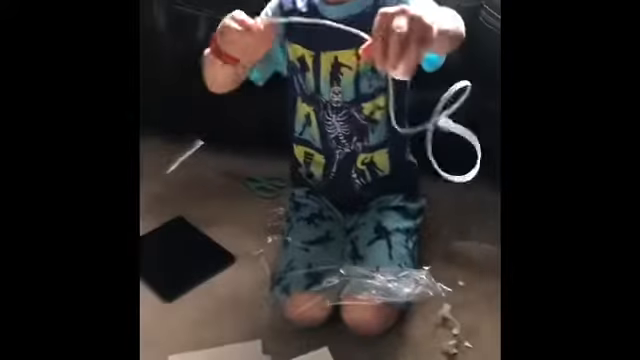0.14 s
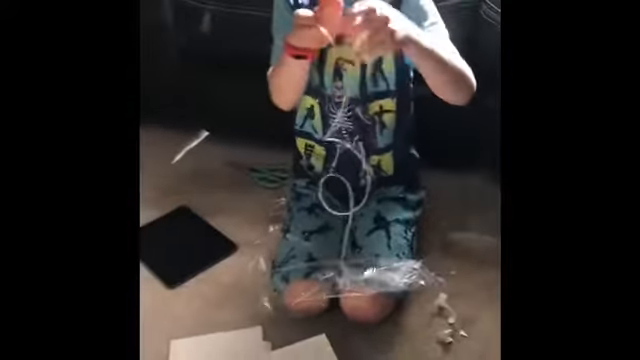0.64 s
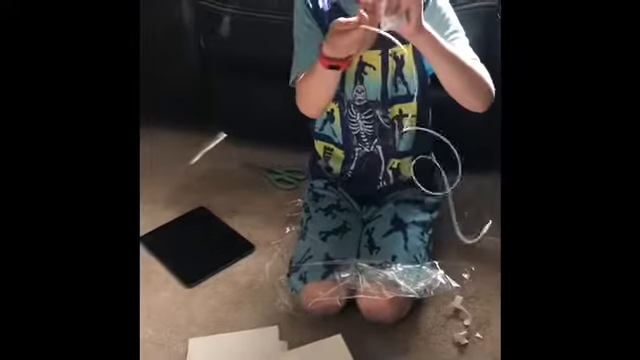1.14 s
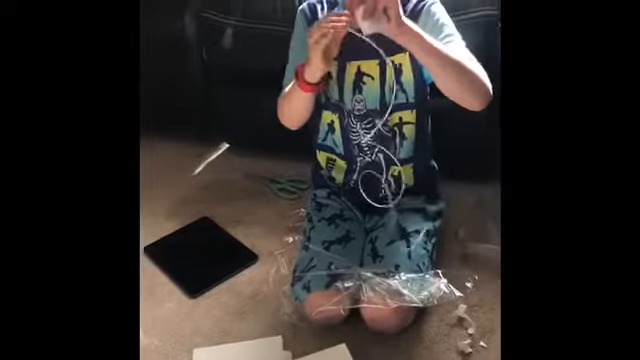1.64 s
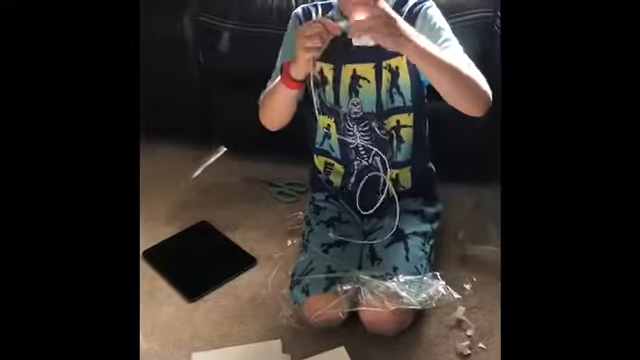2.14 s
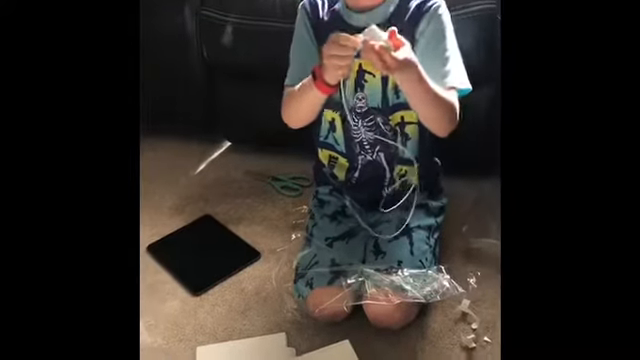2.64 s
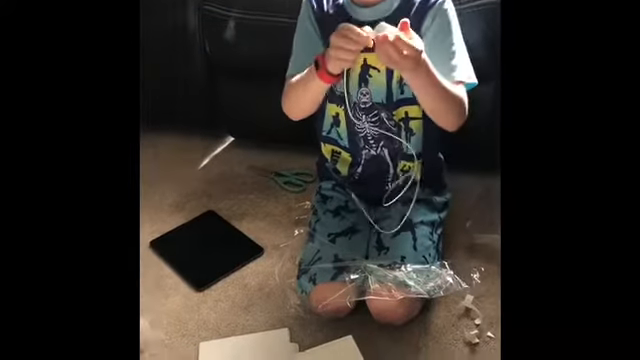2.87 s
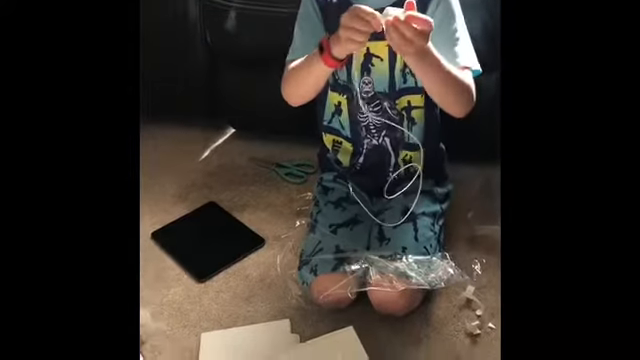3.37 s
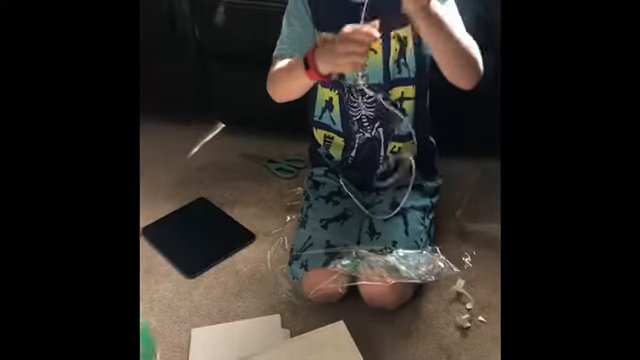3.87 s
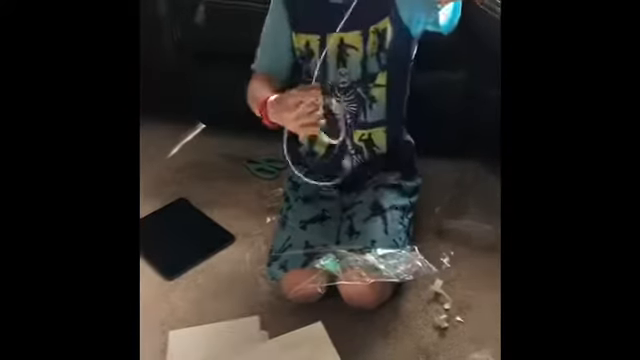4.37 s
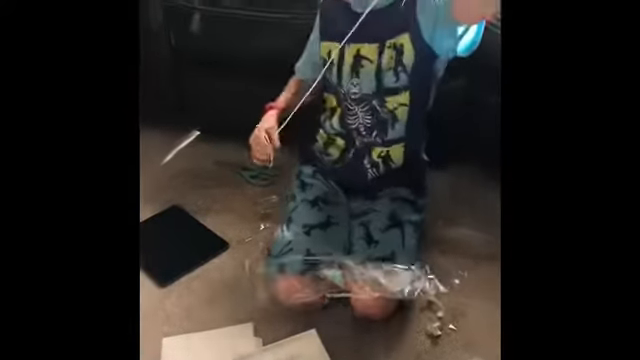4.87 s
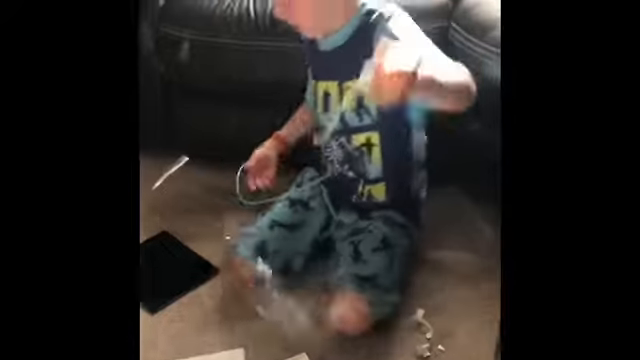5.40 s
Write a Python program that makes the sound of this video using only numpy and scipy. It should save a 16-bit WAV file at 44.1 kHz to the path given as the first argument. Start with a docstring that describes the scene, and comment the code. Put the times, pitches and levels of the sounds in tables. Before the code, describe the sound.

Thin clear plastic wrapping crackles and rustles in irregular bursts with dull hollow knocks, one sharp loud snap midway, in a quiet carpeted room.

```python
"""Thin plastic film and a hollow cardboard box are handled in a carpeted living room for 5.5 s.
From the start the film hisses (shaped, clumpy noise) and the dragged box hums and thuds (lumpy noise through its modes).
Creases snap (noise bursts through resonances) and hands knock (pushes through the box modes), densely until 1.2 s.
A sparser stretch follows; from 2.6 s it gets busier, with the hardest snaps and blow near 3.37 s, then lighter creasing.
A short, dull echo (decaying noise tails) follows snaps and knocks; quiet room tone (shaped noise) runs throughout."""
import sys
import numpy as np
from scipy import signal
from scipy.fft import rfft, irfft, next_fast_len
from scipy.io import wavfile
from scipy.ndimage import uniform_filter1d, map_coordinates

SR = 44100
rng = np.random.default_rng(int(sys.argv[2]) if len(sys.argv) > 2 else 0)


def pcm_store(signal):
    """Save signal as 16-bit PCM."""
    levels = np.round(np.clip(np.atleast_2d(signal), -1, 1) * 32767)
    wavfile.write(sys.argv[1], SR, levels.astype(np.int16).T)


def gain_from_db(level_db):
    """Convert decibel levels to linear amplitude factors (20 dB per decade)."""
    decades = np.asarray(level_db, float) / 20
    return 10 ** decades


N = 243161

# creases, sharp snaps to slow crumples: start_s, peak_db, ring_hz, body_db (7 dB under body re ring rms), rise_ms
CREASES = [(.0199, -23, 3960, -11.5, 1.53), (.1331, -42, 3700, -21, 0.73), (.187, -29.5, 2000, 28, 0.54),
           (.2328, -29.5, 5200, -34, 1.4), (.2558, -27.5, 2100, -6, 1.23), (.2864, -36, 2340, 0, .99),
           (.341, -24, 5030, -36, 1.2), (.3514, -33, 5130, -18, 2.2), (.402, -30.5, 6050, -7, 3.25),
           (.4514, -24, 3480, -10, 0.81), (.4663, -27, 3210, -15, 5.5), (.4814, -39, 2500, -23, 9.4),
           (.5771, -35, 5700, -24, 0.47), (.611, -33, 2650, -3, 0.94), (.6559, -30, 2124, 1, 0.75),
           (.6809, -33, 2260, 15, 0.36), (.7173, -27.5, 2530, 25, 0.89), (.7452, -31, 2310, -19, 1),
           (.7951, -29.5, 6500, -26, 2.7), (.8094, -29.5, 6600, -8.5, 9.1), (.9664, -32, 2280, 0, 0.89),
           (1.0114, -35.5, 5700, -9, 2.86), (1.1109, -25, 2560, 1.5, 0.68), (1.1608, -38.5, 5500, 18, .7),
           (1.2057, -33.5, 2880, -3, .97), (1.6229, -37.5, 2500, -11.5, 4.5),
           (1.723, -37.5, 1990, -9.5, 9.8), (1.847, -35.5, 4950, -13, 4.2), (2.2707, -35.5, 4800, -9, 0.6),
           (2.3294, -39.5, 2330, -7, 0.82), (2.4104, -43, 6750, -7, 0.59), (2.532, -45, 3020, -6, 1.7),
           (2.59, -26.5, 6100, 0, 1.54), (2.6134, -27.5, 4300, -32, 0.96), (2.6299, -25, 6940, -12, 2.1),
           (2.6514, -20.5, 6480, -16, 1.5), (2.9048, -40, 4200, -37, 1.16), (2.9744, -44, 5000, -6, 2.7),
           (3.0545, -40, 7000, -5, 0.95), (3.0764, -39.5, 2800, -4.5, .96), (3.1552, -23, 4600, -7, 7.6),
           (3.1744, -34.5, 3680, -32, 10.7), (3.1966, -23, 6240, -12.5, 3.9), (3.3059, -27, 4540, 1, 2.7),
           (3.3672, -8.5, 2680, -9, .7), (3.3677, -8.5, 5460, -24, 0.57), (3.4072, -15, 3220, -2, 0.54),
           (3.465, -24.5, 8600, -20, 0.64), (3.5394, -33.5, 4330, -14, 0.8), (3.593, -43, 6000, -19, 3.7),
           (3.6601, -37.5, 3920, -21, 1.3), (3.7828, -34, 5970, -10, 1.5), (3.7878, -26, 5400, -8.5, 0.57),
           (3.8464, -32.5, 5520, 9, 0.69), (3.937, -33, 3000, -14, 0.8), (3.9559, -33, 2700, -7, 8),
           (4.0574, -31, 4570, -49, 10), (4.0716, -25, 3500, -43, 6.7), (4.1194, -31.5, 3420, -23, 0.65),
           (4.3076, -47.5, 5240, -37, 1.2), (4.3256, -50, 3940, -26, 1.1), (4.4124, -36.5, 5030, -18, 1.9),
           (4.4243, -34, 5600, -16, 0.72), (4.4674, -48, 5400, -22, 1.4), (4.595, -46.5, 5300, -28, 7.5),
           (4.666, -45, 2000, -2, 0.55), (4.6922, -22.5, 3800, -33, 0.91), (4.7486, -55, 3460, -15, .8),
           (4.7611, -32.5, 4150, -38, .99), (4.8494, -33, 3550, -13.5, 0.78),
           (4.889, -42.5, 5460, -26, 4.6), (4.9382, -24.5, 4050, -17, 0.64), (4.9781, -38, 3350, -7, 1.66),
           (5.03, -46, 7000, -34, 1.6), (5.095, -47.5, 4270, -3, 1.2), (5.1292, -44, 4220, -18, 8.9),
           (5.2254, -48, 5500, -18, 0.86), (5.2694, -53, 9500, -21, 0.54), (5.3158, -42.5, 2370, -7, 5.2),
           (5.4041, -34, 2920, -31, 6.9), (5.447, -35.5, 2090, -13, 4.6)]
# blows on the box: start_s, peak_db, loudest_mode_hz, contact_ms
BLOWS = [(0.021, -28.5, 158, 2.5), (0.19, -28, 605, 2.04), (0.26, -28, 225, 0.43),
         (0.288, -20.5, 598, 0.85), (0.303, -8.5, 216, 1.3), (0.31, -41, 226, 1.2), (0.328, -24.5, 88, 3.3),
         (0.452, -17.5, 345, 2), (0.46, -17, 138.5, 1.67), (0.479, -22.5, 203, 0.79), (0.52, -28.5, 80, 3),
         (0.555, -28.5, 268, 0.72), (0.621, -26.5, 367, 1.9), (0.65, -18.5, 220, 1.5),
         (0.687, -27.5, 268, 2.1), (0.843, -26, 318, 0.91), (0.845, -27.5, 950, 0.66),
         (0.965, -34, 640, 1.9), (1.109, -45, 830, 1.8), (1.208, -28.5, 380, 1.23), (1.62, -39, 141, 3.8),
         (2.589, -34.5, 875, 1.4), (2.614, -30.5, 660, 0.83), (2.634, -23.5, 600, 1.13),
         (2.652, -24, 322, 1.8), (3.052, -34, 376, 3.5), (3.158, -32.5, 630, 1.5), (3.197, -35, 645, 2),
         (3.31, -16, 278, 1.27), (3.326, -26.5, 256, 2.8), (3.368, -5.5, 306, 2.78), (3.383, -26, 230, 1.8),
         (3.412, -17, 249, 2.1), (3.429, -20.5, 100, 1.46), (3.471, -28, 120, 3), (3.666, -30.5, 250, 2.43),
         (3.785, -25.5, 346, 2.2), (3.852, -19.5, 237, 1.04), (3.898, -25, 252, 1.3),
         (4.115, -30.5, 210, 1.66), (4.396, -34.5, 240, 2.1)]


def unit(x):
    """Scaled to rms 1."""
    return x / np.sqrt(np.mean(x ** 2) + 1e-20)


def along(points, hz):
    """(Hz, value) points interpolated on a log-frequency axis."""
    point_hz, value = np.transpose(points)
    return np.interp(np.log(hz + 1), np.log(point_hz + 1), value)


def shape(points, hz):
    """Gain of a (Hz, dB) spectrum, silent outside its ends."""
    inside = (hz >= points[0][0]) * (hz <= points[-1][0])
    return gain_from_db(along(points, hz)) * inside


def curves(rows):
    """One value per sample for each column after the time."""
    s, *columns = np.transpose(rows)
    return [np.interp(np.arange(N) / SR, s, column) for column in columns]


def wobble(rate_hz):
    """A smooth random curve through rate_hz random knots a second."""
    knots = rng.standard_normal(int(N * rate_hz / SR) + 4)
    return map_coordinates(knots, [np.arange(N) * rate_hz / SR])


def filtered(x, response):
    """x passed through a complex response of frequency."""
    size = next_fast_len(len(x) + 8192)
    spectrum = rfft(x, size) * response(np.fft.rfftfreq(size, 1 / SR))
    return irfft(spectrum, size)[:len(x)]


def mode(f, hz, width_hz):
    """One causal resonance, gain 1 at its peak."""
    return 1j * f * width_hz / (hz * hz - f * f + 1j * f * width_hz)


def both(*levels):
    """Amplitude of independent sounds together: their powers add."""
    return np.linalg.norm(levels, axis=0)


def burst(rise_ms, size):
    """A cluster of uneven slips swells to its peak and dies away: short is sharp, long is soft."""
    u = np.arange(size) / SR / (rise_ms / 1000)
    lumps = np.repeat(gain_from_db(2.06 * rng.standard_normal(size // 32)), 32)  # slips under a millisecond long
    return rng.standard_normal(size) * lumps * (u * np.exp(-u)) ** 1.38


def add(track, start_s, sound, peak_db):
    """Lays a sound on a track, its loudest 3 ms at the given nominal peak."""
    loudest = np.sqrt(uniform_filter1d(sound ** 2, size=132).max())
    gain = gain_from_db(peak_db - 7.5) / loudest  # peak to short-time rms
    track[round(start_s * SR):][:len(sound)] += gain * sound


def wake(events, level_db, decay_s, follows):
    """An amplitude builds up after each event, more for a strong one (follows: dB per dB), and dies away."""
    typical_db, rise_s = -30, 0.002  # level_db is for a typical event, before the rise smooths it
    s, peak_db = np.transpose(events)[:2]
    kicks = gain_from_db(2 * (level_db + follows * (peak_db - typical_db)))
    power = np.bincount((s * SR).astype(int), kicks, N)
    keep = np.exp(-2 / (decay_s * SR))  # power dies twice as fast as amplitude
    lag = np.exp(-1 / (rise_s * SR))
    return np.sqrt(signal.lfilter([1 - lag], np.convolve([1, -keep], [1, -lag]), power))


def air():
    """Quiet room tone: steady noise under a fixed spectrum."""
    # relative spectrum: freq_hz, level_db_per_hz
    air_spectrum = [(18, -48), (30, -8), (95, 13), (252, 0.5), (702, -31), (1010, -4), (2610, -63),
                    (3140, -11), (5740, -20), (12300, -31), (16000, -41)]
    noise = rng.standard_normal(N)
    return gain_from_db(-59.5) * unit(filtered(noise, lambda f: shape(air_spectrum, f)))


def sheen_db(ring_hz, rise_ms):
    """Treble beside that of a 4 kHz, 1 ms crease: small panels are brighter, slow swells duller."""
    per_octave_db, per_slowing_db = 7.5, -2  # slowing: each doubling of the rise
    return per_octave_db * np.log2(ring_hz / 4000) + per_slowing_db * np.log2(rise_ms)


def settling():
    """Film settles after each crease, louder after a slow crumple; returns amplitudes of hiss and treble."""
    s, peak_db, ring_hz, _, rise_ms = np.transpose(CREASES)
    strength_db = peak_db + 2.5 * np.log2(rise_ms)
    hiss = wake(np.c_[s, strength_db], level_db=-58, decay_s=0.03, follows=1)
    bright_db = strength_db + sheen_db(ring_hz, rise_ms)
    return hiss, wake(np.c_[s, bright_db], level_db=-58, decay_s=0.03, follows=1)


def strokes():
    """A hand's quick strokes along the film swell and fade as bells; returns amplitudes of hiss and treble."""
    # strokes: peak_s, level_db, swell_s, fade_s, treble_db (beside the hiss)
    stroke_rows = [(.41, -46, 0.0098, .03, -4), (.47, -44, 0.022, 0.037, -16), (.58, -56, 0.027, 0.01, 4.5),
                   (.83, -47, 0.046, 0.037, 3), (1.02, -55, 0.044, 0.024, -3),
                   (1.85, -49, 0.019, 0.027, -2.5), (1.97, -55, 0.027, 0.072, -10),
                   (2.16, -60.5, 0.032, 0.027, -5.5), (2.32, -59, 0.018, 0.024, -4),
                   (2.5, -59.5, .05, 0.026, -7), (2.64, -48.5, 0.017, 0.062, -8),
                   (2.88, -61.5, 0.022, 0.097, -2.5), (3.43, -50.5, 0.051, 0.032, 0),
                   (3.16, -37.5, 0.0041, 0.029, -0.5), (3.6, -60, 0.0069, 0.011, 5.5),
                   (3.81, -53, 0.031, 0.03, 1.5), (3.9, -60, 0.03, 0.041, 1), (4.09, -55, .02, 0.036, 4.5),
                   (4.42, -58.5, 0.024, 0.056, -4), (4.6, -60.5, 0.032, 0.072, -3),
                   (4.77, -59, 0.026, 0.029, -3), (5.15, -55, 0.019, 0.05, -3)]
    s, level_db, swell_s, fade_s, treble_db = np.transpose(stroke_rows)[..., None]
    t = np.arange(N) / SR - s
    width_s = np.maximum(np.where(t < 0, swell_s, fade_s), .005)  # 5 ms at least
    power = gain_from_db(2 * level_db) * np.exp(-(t / width_s) ** 2)
    treble_power = gain_from_db(2 * treble_db) * power
    return np.sqrt(power.sum(axis=0)), np.sqrt(treble_power.sum(axis=0))


def patchy(x):
    """Shifting folds: random gain in patches about a kilohertz by thirty milliseconds."""
    z = signal.stft(x, nperseg=256)[2]
    field = uniform_filter1d(rng.standard_normal(z.shape), size=7, axis=0)
    field = uniform_filter1d(field, size=10, axis=1)
    gain = gain_from_db(2.5 * unit(field))  # rms depth 2.5 dB
    return signal.istft(z * gain, nperseg=256)[1][:N]


def rustle():
    """Sliding film: clumpy rubbing hiss with small ticks; flares under each stroke and as a crease settles; the
    swell that stops abruptly near 1.5 s is probably a sniff."""
    # hiss level, and its body: mostly film rubbing; the swell that stops abruptly near 1.5 s is probably a
    # sniff: time_s, level_db, body_db (beside the hiss)
    hiss_levels = [(0, -55, 0.5), (.16, -61, -3), (.29, -48.5, 2), (.41, -52.5, -4), (.58, -56, -1.5),
                   (.72, -54.5, 1), (.9, -47, -5), (1.08, -59.5, -14), (1.25, -60, -1), (1.5, -51.5, -14.5),
                   (1.54, -69, -5), (1.61, -68.5, 1), (1.66, -62, 9.5), (1.78, -62.5, -4), (1.9, -55, 0),
                   (2.08, -71, -8), (2.25, -63.5, -2.5), (2.56, -65.5, -2), (2.72, -60.5, -3.5), (3.0, -74, -3),
                   (3.13, -56, -7), (3.26, -52.5, -14), (3.35, -59, -8), (3.55, -57, -1), (3.74, -66, -11),
                   (3.8, -60.5, -3.5), (4.0, -60, -3), (4.2, -63, -7), (4.37, -73.5, -1), (4.52, -69, -8),
                   (4.68, -59, -13), (4.9, -59.5, -7), (5.08, -59, -22), (5.27, -64.5, -3), (5.38, -64.5, 2),
                   (5.51, -54, -5)]
    # relative spectra of hiss, body and treble: freq_hz, level_db_per_hz
    hiss_spectrum = [(880, -37), (1500, -7), (2440, 2.5), (3850, 2.5), (4190, 2.5), (4780, 2), (5750, 3.5),
                     (9500, -23), (12400, -60), (20900, -120)]
    body_spectrum = [(500, -6), (800, -7), (1300, 0.5), (2000, -4.5), (2800, -21.5)]
    treble_spectrum = [(6500, 2.5), (9000, 4.5), (12500, 2), (15000, -1.5), (15900, -4), (16500, -29)]
    level_db, body_db = curves(hiss_levels)
    stroke, stroke_treble = strokes()
    settle, settle_treble = settling()

    clumps = gain_from_db(1.2 * wobble(45) + 1.6 * wobble(160))
    tick_hits = rng.random(N) < 1500 / SR  # 1500 a second on average
    ticks = tick_hits * gain_from_db(4.9 * rng.standard_normal(N)) * rng.choice([-1, 1], N)
    grain = patchy(clumps * (rng.standard_normal(N) + 0.51 * unit(ticks)))

    def part(spectrum):
        return unit(filtered(grain, lambda f: shape(spectrum, f)))

    hiss = both(gain_from_db(level_db), stroke, settle)
    # settling has its own body (+3.5 dB) and treble (-7.5 dB) balance
    body = both(gain_from_db(level_db + body_db), gain_from_db(body_db) * stroke, gain_from_db(3.5) * settle)
    treble = both(gain_from_db(level_db - 5.5), stroke_treble, gain_from_db(-7.5) * settle_treble)
    return hiss * part(hiss_spectrum) + body * part(body_spectrum) + treble * part(treble_spectrum)


def box(f, scatter_db):
    """Response of the box walls: modes of alternating sign, each caught at a new strength."""
    # wall modes: mode_hz, width_hz, level_db (before scatter)
    box_modes = [(81, 28, -4.5), (109, 21, -1), (166.3, 24, -1), (241.5, 28, 1), (286, 38.4, -1.5),
                 (350.4, 46.4, -1.5), (457, 186, -5), (569, 66, -4), (624, 31.4, -3), (874, 150, -10.5),
                 (1044, 59, -9), (1130, 280, -19.5)]
    total = 0
    for k, (hz, width_hz, level_db) in enumerate(box_modes):
        strength = gain_from_db(level_db + scatter_db * rng.standard_normal())
        total = total + (-1) ** k * strength * mode(f, hz, width_hz)
    return total


def drag():
    """Lumpy friction keeps the box humming and thuds into the floor, which booms on after each blow."""
    # pressing and dragging, and weight into the floor: time_s, level_db, thud_db (beside the hum, before drift)
    press = [(0, -43.5, -1), (.18, -53, -10), (.3, -40, -1), (.42, -42.5, -10), (.47, -36, 6),
             (.6, -43.5, -18), (.7, -42, -4), (.83, -37.5, -19), (.92, -45, -10), (1.09, -55.5, -2),
             (1.23, -48, -4), (1.34, -54, -5.5), (1.47, -50.5, -2), (1.63, -62.5, -9), (1.82, -50, -6),
             (2.03, -51.5, -13), (2.2, -55, -6), (2.55, -55, -6.5), (2.69, -49, -16), (2.81, -54, -2),
             (3.0, -56.5, -11), (3.27, -44.5, -1), (3.33, -40, -1), (3.45, -41.5, 2.5), (3.64, -54.5, 8),
             (3.77, -53.5, 1.5), (3.88, -38.5, -3), (4.07, -53, 1), (4.28, -58.5, -1), (4.44, -50.5, 2),
             (4.65, -57, 1), (4.95, -58.5, -6.5), (5.27, -59, -1), (5.51, -60.5, 1)]
    # relative thud spectrum: freq_hz, level_db_per_hz
    thud_spectrum = [(28, -45), (45, -10), (70, -5.5), (110, -3.5), (160, -8.5), (220, -1.5)]
    level_db, thud_db = curves(press)
    hum_friction = gain_from_db(3.5 * wobble(30)) * rng.standard_normal(N)
    hum = unit(filtered(hum_friction, lambda f: box(f, scatter_db=1.5) * mode(f, 315, 500)))
    thud_friction = gain_from_db(2.2 * wobble(8.6)) * rng.standard_normal(N)
    thud = unit(filtered(thud_friction, lambda f: shape(thud_spectrum, f)))
    drift_db = 1.5 * wobble(10)
    boom = wake(BLOWS, level_db=-55, decay_s=0.074, follows=0.69)
    return gain_from_db(level_db) * hum + both(gain_from_db(level_db + thud_db + drift_db), boom) * thud


def snaps():
    """A crease buckles: a ring set by the panel size, with more or less body and a little top."""
    out = np.zeros(N + SR)
    for s, peak_db, ring_hz, body_db, rise_ms in CREASES:
        slips = burst(rise_ms, size=4096)
        extra_db = sheen_db(ring_hz, rise_ms)
        sheen = 0.4 * gain_from_db(extra_db)
        ring = unit(filtered(slips, lambda f: mode(f, ring_hz, 2620) ** 2 + sheen * mode(f, 6000, 4000)))
        body = unit(filtered(slips, lambda f: mode(f, 787, 930) ** 2))
        top = unit(filtered(slips, lambda f: mode(f, 10800, 5000) ** 2))
        snap = ring + gain_from_db(7 + body_db) * body + gain_from_db(-20.5 + extra_db) * top
        add(out, s - 0.48 * rise_ms / 1000, snap, peak_db)  # the swell begins before it is heard
    return out[:N]


def knocks():
    """A soft push with a rough edge rings the box; the place struck favours the modes near one pitch."""
    out = np.zeros(N + SR)
    for s, peak_db, hz, contact_ms in BLOWS:
        u = np.arange(8192) / SR / (contact_ms / 1000)
        push = np.exp(-np.pi * (u - 1) ** 2 * 2)  # a longer contact is a duller blow
        contact = push + 3 * burst(2.43 * contact_ms, size=8192)
        knock = filtered(contact, lambda f: box(f, scatter_db=4.0) * (0.15 + mode(f, hz, 0.2 * hz)))
        add(out, s - 1.255 * contact_ms / 1000, knock, peak_db)  # the hand lands just before the ring is heard
    return out[:N]


def room(x, piece=8192):
    """Floor and sofa answer after 2 ms, each frequency dies at its own speed; hands move, so the tail changes."""
    # reverberation: freq_hz, t60_s
    decay_times = [(150, 0.35), (500, 0.39), (2000, 0.33), (8000, 0.21), (15000, 0.063)]
    out = np.zeros(N + SR)
    for start in range(0, N, piece):
        hz, t, z = signal.stft(rng.standard_normal(SR // 2), SR, nperseg=256)
        late = gain_from_db(-60 * t / along(decay_times, hz)[:, None])
        early = 2.8 * gain_from_db(-60 * t / 0.013)
        tail = signal.istft(z * (late + early), SR, nperseg=256)[1]
        wet = signal.fftconvolve(x[start:start + piece], tail / np.linalg.norm(tail))
        out[start + 90:][:len(wet)] += wet
    return out[:N]


def scene():
    """Film and box with their echo, over the room tone."""
    film, cardboard = snaps(), knocks()
    echo = room(gain_from_db(-3.0) * film + gain_from_db(-4.5) * cardboard)
    return (air() + rustle() + drag() + film + cardboard + echo)[None]


def top_cut(x):
    """Nothing passes above the cut-off."""
    return signal.sosfilt(signal.butter(12, 16510, fs=SR, output="sos"), x)


def record(dry):
    """The microphone chain rolls off in the deep bass and at the very top."""
    low_cut_hz, top_hz = 39, 15850

    def microphone(f):
        bass_cut = (1j * f / (low_cut_hz + 1j * f)) ** 2
        return bass_cut / (1 + (f / top_hz) ** 60)

    return top_cut(filtered(dry[0], microphone)[None])


dry = scene()
out = record(dry)
pcm_store(out)
```